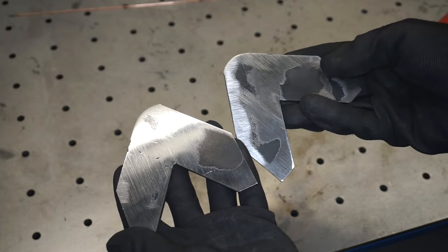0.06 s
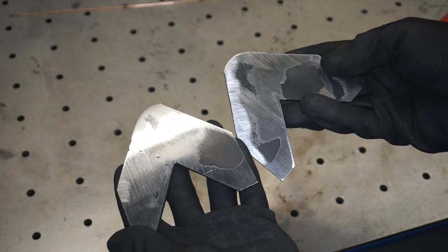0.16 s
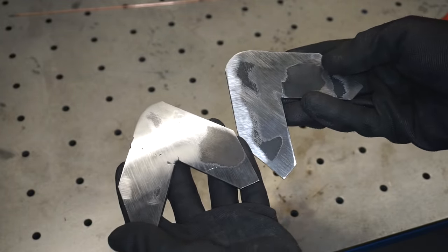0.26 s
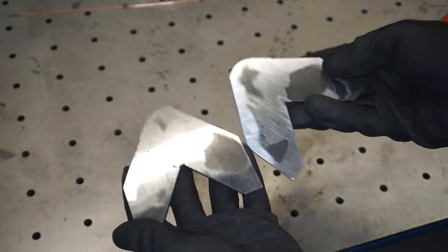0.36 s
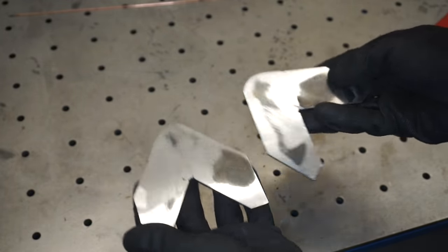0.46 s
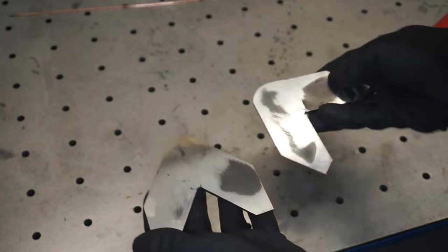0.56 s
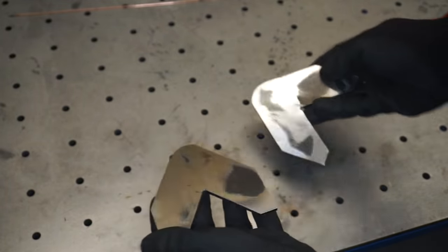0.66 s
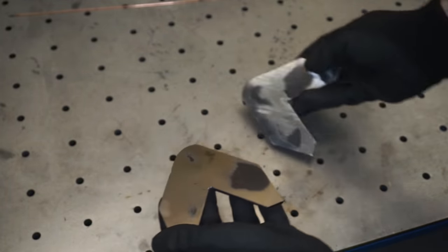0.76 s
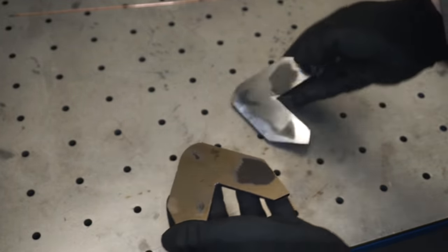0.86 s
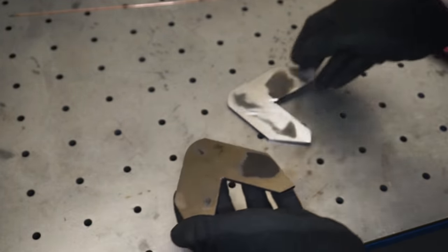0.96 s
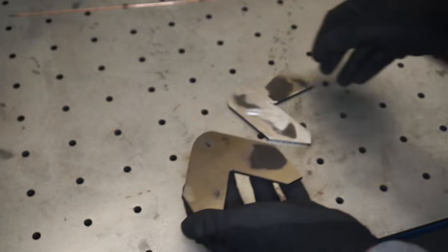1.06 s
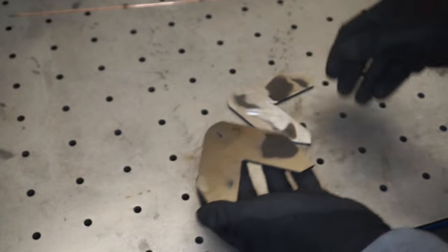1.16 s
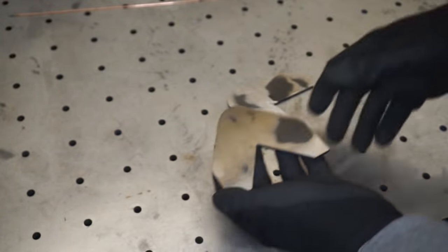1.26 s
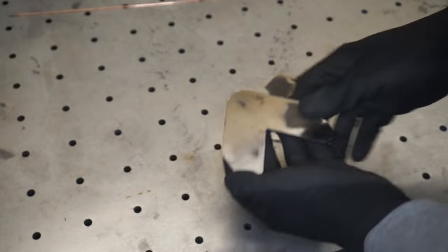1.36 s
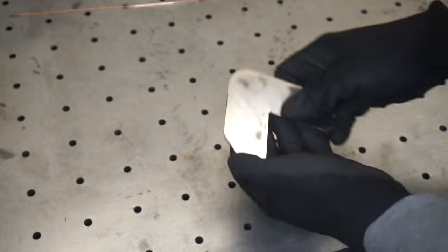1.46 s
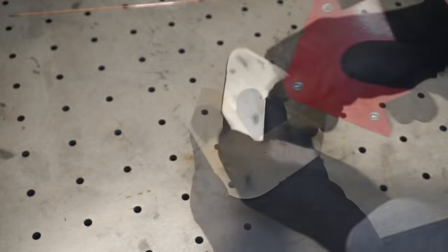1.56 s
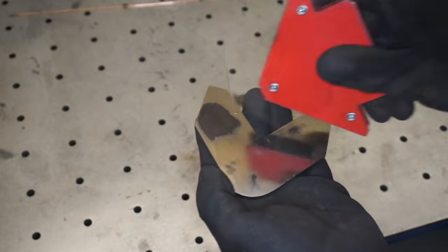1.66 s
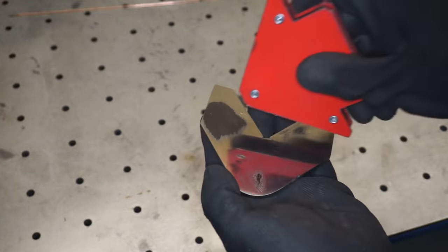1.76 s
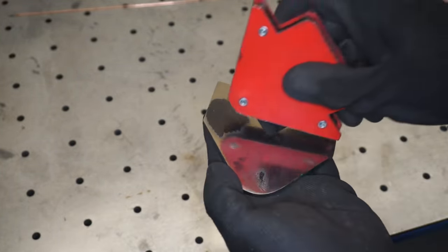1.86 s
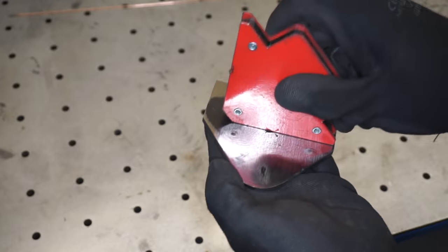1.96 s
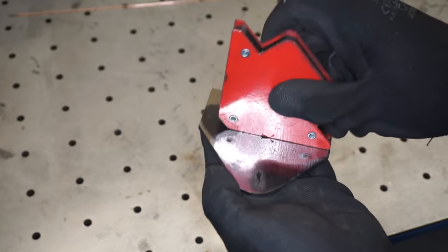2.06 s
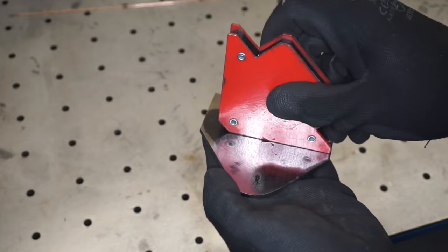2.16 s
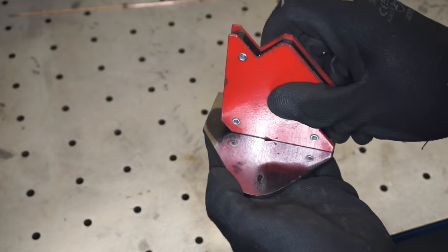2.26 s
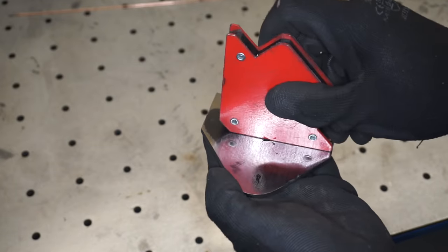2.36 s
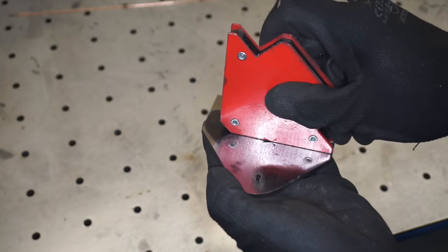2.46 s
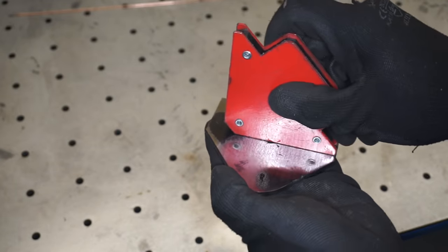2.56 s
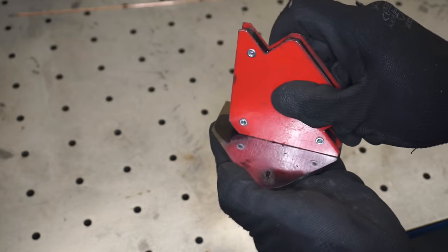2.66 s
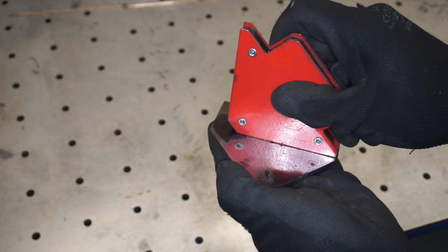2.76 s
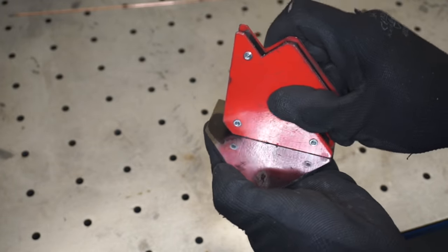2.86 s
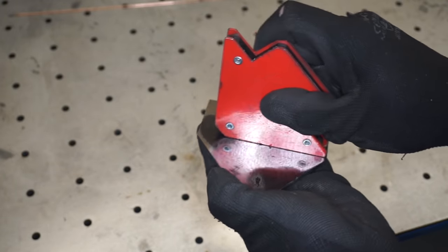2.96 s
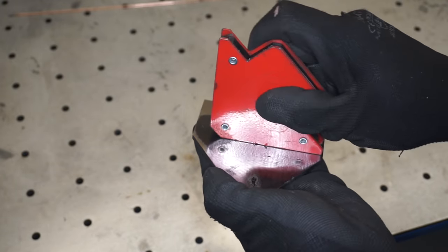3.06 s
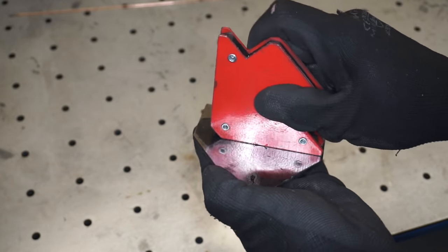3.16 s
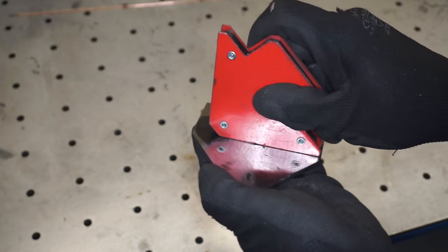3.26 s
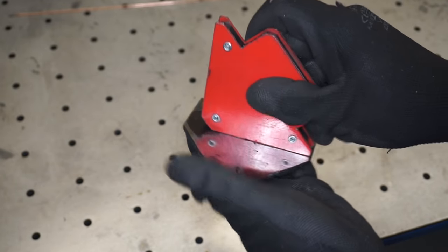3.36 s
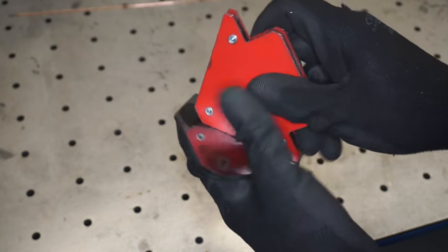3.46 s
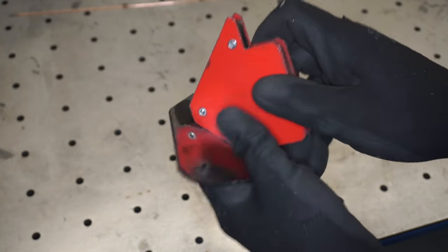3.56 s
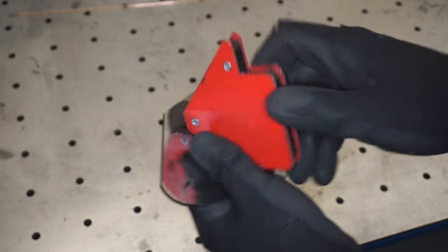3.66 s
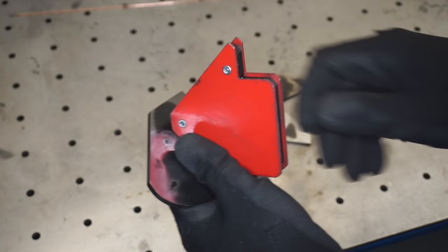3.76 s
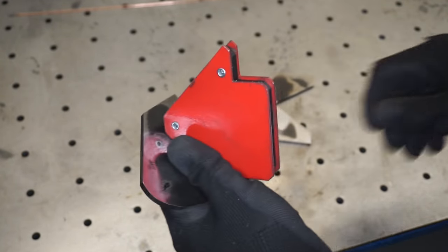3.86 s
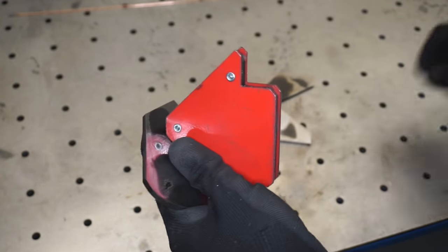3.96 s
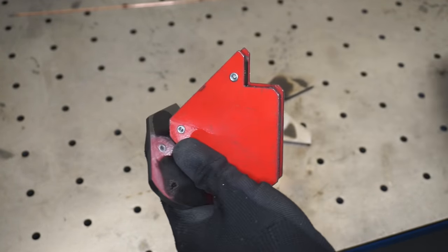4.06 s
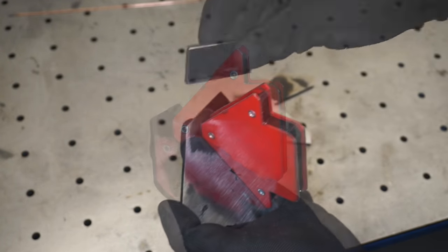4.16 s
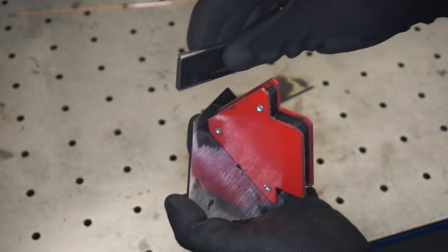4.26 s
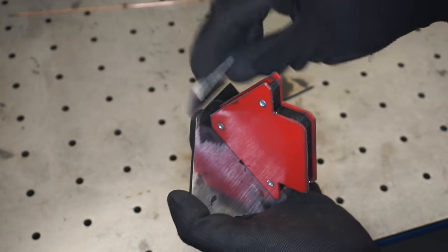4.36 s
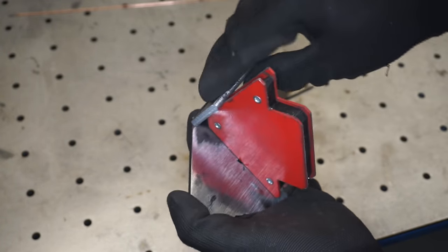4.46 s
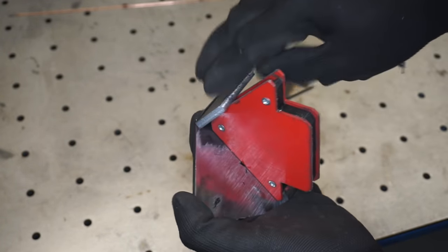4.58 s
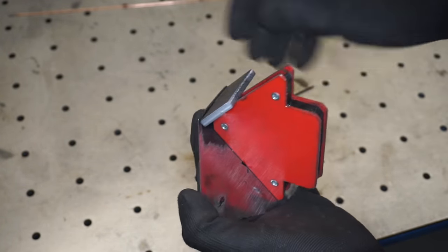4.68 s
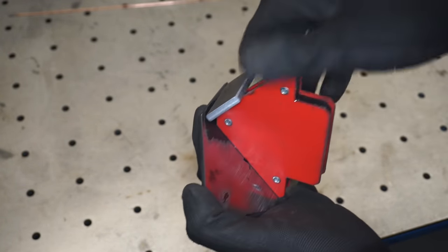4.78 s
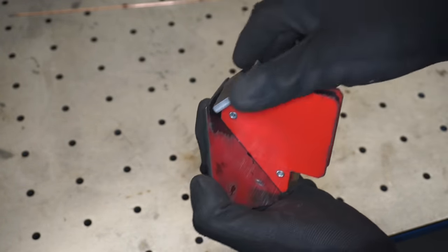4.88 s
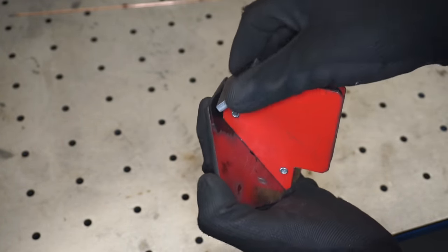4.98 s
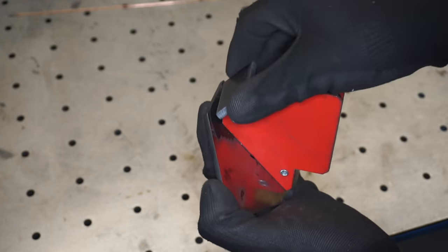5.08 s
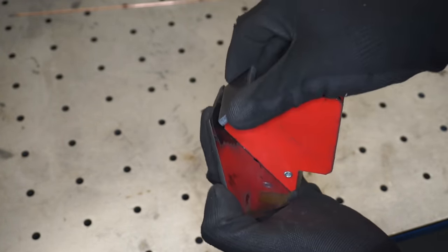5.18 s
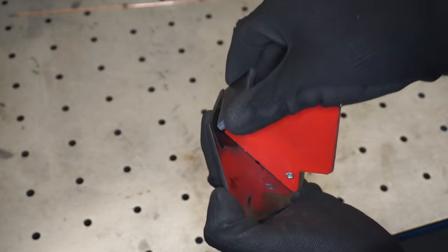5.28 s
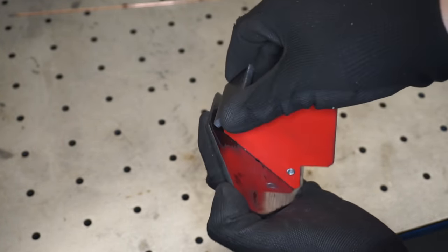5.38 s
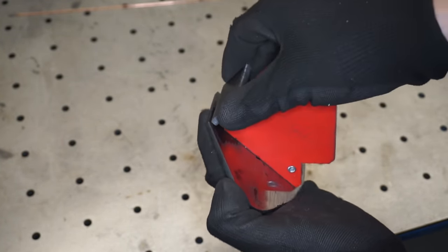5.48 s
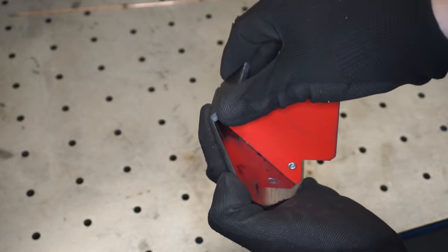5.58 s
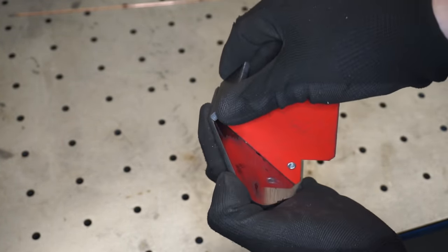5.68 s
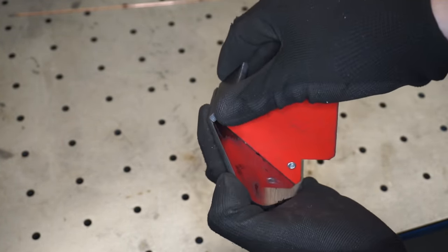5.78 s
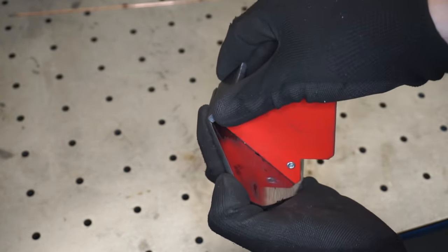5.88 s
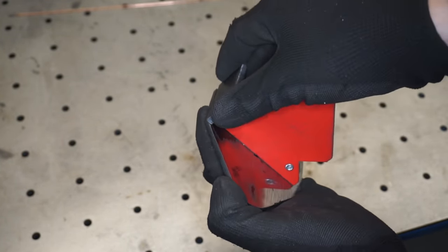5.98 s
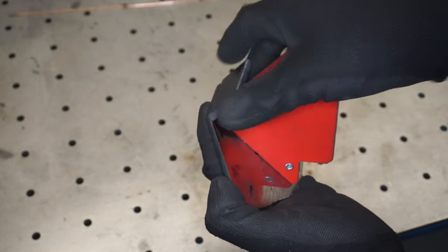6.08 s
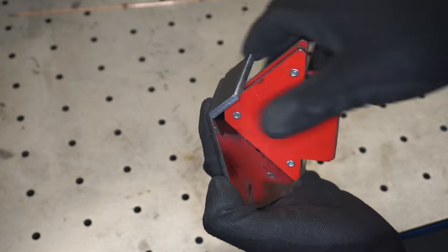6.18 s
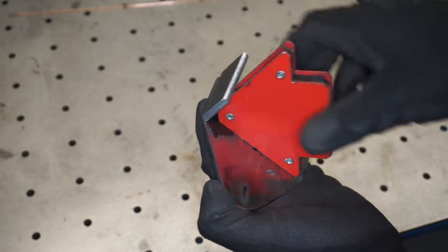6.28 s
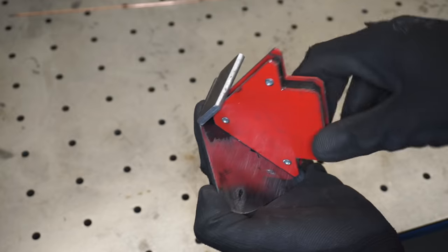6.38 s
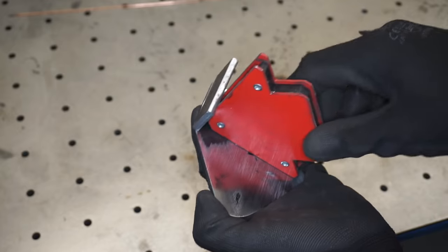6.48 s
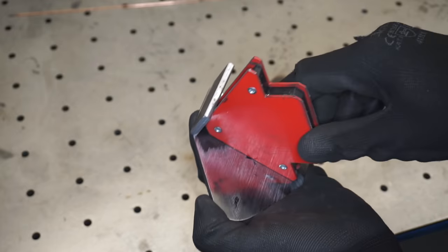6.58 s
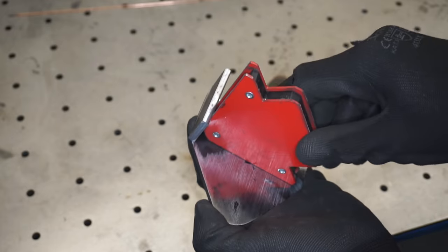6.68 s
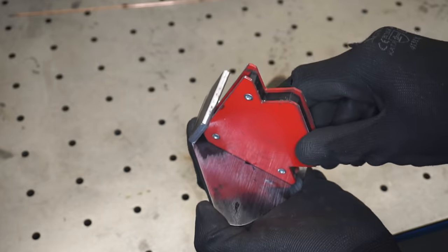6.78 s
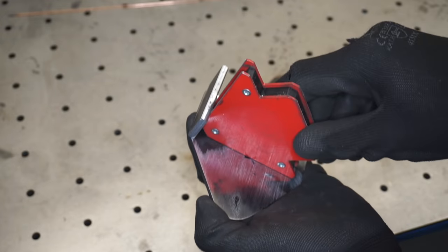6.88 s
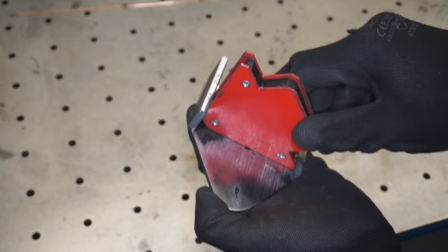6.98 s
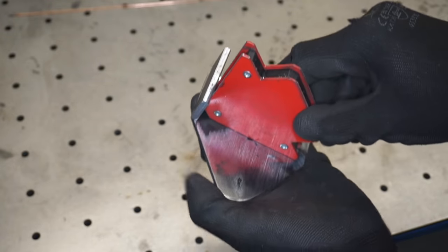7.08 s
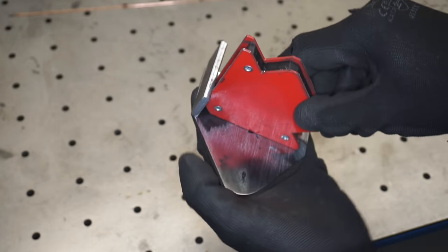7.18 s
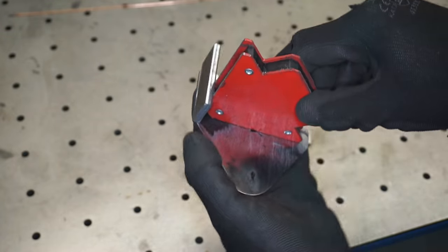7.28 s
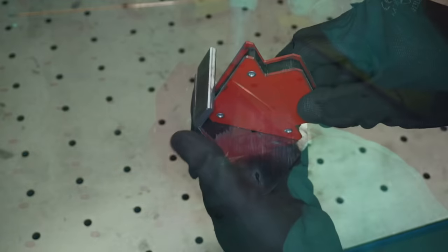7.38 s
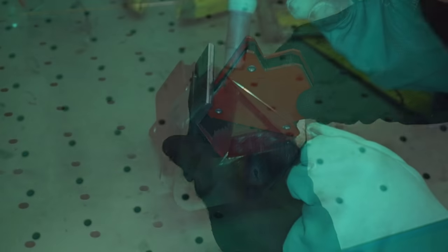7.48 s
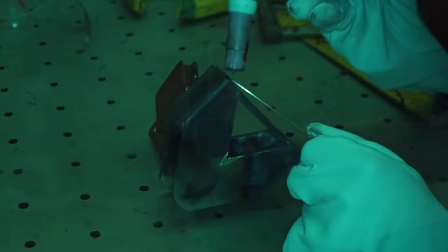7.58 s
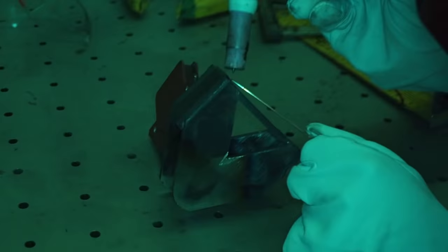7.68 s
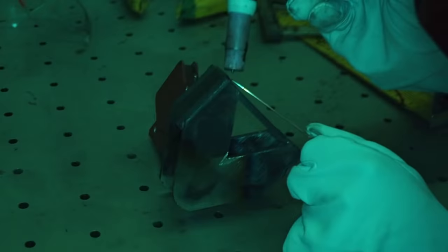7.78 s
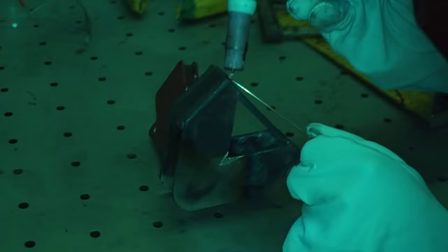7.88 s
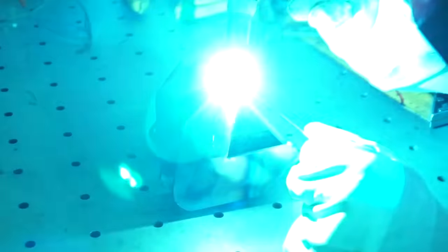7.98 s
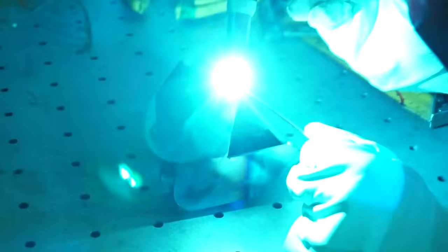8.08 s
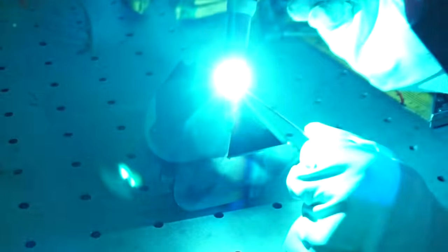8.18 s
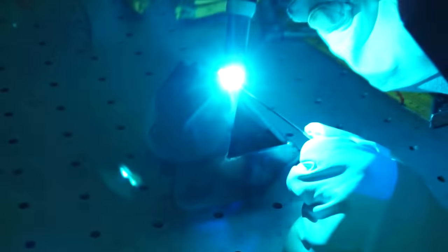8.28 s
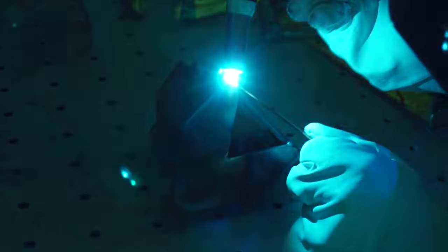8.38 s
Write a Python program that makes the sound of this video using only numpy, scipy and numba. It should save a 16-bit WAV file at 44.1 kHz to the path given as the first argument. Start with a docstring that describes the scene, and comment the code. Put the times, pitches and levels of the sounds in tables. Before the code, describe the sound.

Gloved hands handle small steel parts, heard close with short bright room reflections. A bracket clatters down in quick uneven knocks, a magnet clacks on loudly, and a plate snaps flat and is pushed home. Quiet rustles fill the gaps over faint room tone. Then hollow gas flow starts, two crackling sparks light a welding arc, and its fine hiss continues.

```python
"""A small hard workshop: flat steel brackets clatter onto a steel table, a magnet square snaps onto one, a plate clicks.
Each blow excites decaying modes and a decaying wash of dense overtones; gloves and sliding steel are shaped noise.
Then gas rushes from a TIG torch (resonant noise), the starter sparks twice and the arc hisses on with a thin whine.
Diffuse reflections follow the blows, rubs and arc; a limiter ducks under strong peaks and a low-pass cuts the top."""
import sys
import numpy as np
from scipy import signal
from scipy.fft import rfft, irfft
from scipy.io import wavfile
from scipy.ndimage import uniform_filter1d, minimum_filter1d
from numba import njit

SR = 44100
rng = np.random.default_rng(int(sys.argv[2]) if len(sys.argv) > 2 else 0)


def dump(signal):
    """Clip the signal to [-1, 1] and save it as 16-bit WAV at the path in sys.argv[1]."""
    limited = np.clip(np.atleast_2d(signal).T, -1, 1)
    pcm = np.round(limited * 32767).astype(np.int16)
    wavfile.write(sys.argv[1], SR, pcm)


N = 371763
TIME = np.arange(N) / SR

# Likeness of left and right in sound from all around. Each row: frequency in Hz, correlation.
DIFFUSE_LIKENESS = [(100, .97), (330, .96), (450, .92), (620, .76), (1200, .42), (3500, .05), (10000, -.1)]
# Likeness of left and right in sound straight from a source. Each row: frequency in Hz, correlation.
DIRECT_LIKENESS = [(400, .95), (1500, .75), (4000, .42), (10000, .25)]
# Dense overtones of small steel contacts. Each row: frequency in Hz, relative level in dB per Hz.
SMALL_CONTACT_BODY = [(100, -37.5), (500, -23.5), (1000, -18.5), (1400, -3.5), (2800, 1.5), (4100, 5),
                      (5300, -5.5), (7000, -2), (8500, -11), (11500, -8), (16000, -23.5)]
# Broad resonances of the plate against the magnet. Each row: frequency in Hz, width in Hz, full lift in dB.
PLATE_RESONANCES = [(1560, 540, 5), (1856, 740, 9), (4150, 530, 2.5)]


def amp(db):
    """Level to amplitude: 20 dB is a factor of ten."""
    return 10 ** (np.asarray(db) / 20)


def unit(x):
    """Normalization: equal mean power gives every sound rms 1."""
    return x / np.sqrt(np.mean(x ** 2))


def at_hz(table, hz):
    """Logarithmic pitch: (Hz, value) points are joined by straight lines over log frequency."""
    f, value = np.transpose(table)
    return np.interp(np.log(hz + 1), np.log(f), value)


def fade(t60, size):
    """Viscous damping: a free vibration decays exponentially, by 60 dB in t60 seconds."""
    return np.exp(-np.log(1000) * TIME[:size] / t60)


def envelope(start_s, length_s, rise_s, fall_s):
    """Attack, hold and release: a gain eases in from the start and dies away after the length."""
    age = np.maximum(TIME - start_s, 0)
    attack = 1 - np.exp(-(age / rise_s) ** 2)
    release = np.exp(-np.maximum(age - length_s, 0) / fall_s)
    return attack * release


def flicker(rate, depth_db):
    """Random modulation: a gain wanders between random levels drawn rate times a second."""
    knots = rng.standard_normal(N)
    level_db = depth_db * np.interp(TIME * rate, np.arange(N), knots)
    return unit(amp(level_db))


def noise(colour, likeness, size=N, tilt_db=0, peaks=()):
    """Spectral shaping: white noise is weighted by a colour, a tilt in dB per octave and resonances, to rms 1."""
    hz = np.arange(size // 2 + 1) * SR / size
    db = at_hz(colour, hz) + tilt_db * np.log2(hz / 4000 + .1)
    db = db + sum(lift / (1 + (2 * (hz - f) / width) ** 2) for f, width, lift in peaks)
    # the balance of mid and side sets the correlation of left and right
    alike = np.clip(at_hz(likeness, hz), -1, 1)
    white = rfft(rng.standard_normal((2, size)))
    mid, side = white * amp(db) * np.sqrt([1 + alike, 1 - alike])
    return unit(irfft([mid + side, mid - side], size))


def add(out, s, sound):
    """Superposition: sound pressures sum, here from time s on."""
    i = int(s * SR)
    out[:, i:i + sound.shape[1]] += sound[:, :N - i]


def pan(x, left_db):
    """Level-difference stereo: left_db is the left level minus the right."""
    return x * amp(np.array([[left_db], [-left_db]]) / 2)


def strike(blows, modes, body, body_t60, peaks=(), scatter_db=2):
    """Modal excitation: each blow starts a decaying wash of dense overtones and the piece's clear modes."""
    out = np.zeros((2, N))
    hz, mode_db, t60 = np.transpose(modes)[:, :, None]
    contact = 1 - np.exp(-(TIME[:SR] / 0.0012) ** 2)  # the push builds up in about a millisecond
    for s, db, tilt_db, ring_db in blows:
        # the point of contact weights the modes
        scatter = scatter_db * rng.standard_normal(hz.shape)
        weight = amp(mode_db + tilt_db * np.log2(hz) + scatter)
        # each mode has its own phase difference between the channels, smaller below 4 kHz
        lag = rng.uniform(-0.69, 1, hz.shape) * np.minimum(hz / 4000, 1)
        phase = 2 * np.pi * (hz * TIME[:SR] + rng.random(hz.shape)) + np.array([lag, -lag])
        ring = (weight * fade(t60, SR) * np.sin(phase)).sum(axis=1)
        ring = ring / np.sqrt(np.sum(weight ** 2) / 2)
        wash = noise(body, DIRECT_LIKENESS, size=SR, tilt_db=tilt_db, peaks=peaks) * fade(body_t60, SR)
        add(out, s, amp(db) * contact * (wash + amp(ring_db) * ring))
    return out


def room_tone():
    """Stationary noise: a quiet, steady background of fixed spectrum."""
    # Each row: frequency in Hz, relative level in dB per Hz.
    floor_colour = [(25, -27.5), (60, -18), (107, -18), (168, -16.5), (240, -17.5), (330, -14.5),
                    (450, -21), (900, -26), (1760, -25), (4810, -31.5), (13200, -31), (16000, -39.5)]
    return amp(-60) * noise(floor_colour, DIFFUSE_LIKENESS)


def rumble():
    """Amplitude modulation: faint, deep noise swells now and then above its resting level."""
    # Each row: frequency in Hz, relative level in dB per Hz.
    rumble_colour = [(15, -34), (25, -16), (32, -5.5), (41, -1.5), (55, -15), (90, -33.5), (300, -69.5)]
    # Bouts of rumble. Each row: start in seconds, length in seconds, level in dB.
    bouts = [(0, 0.075, -55), (.62, .25, -77), (1.686, 0.37, -58), (2.57, 0.57, -59.5),
             (3.447, 0.35, -57.5), (5.52, 1.02, -74), (7.48, .25, -74)]
    rest_db, rise_s, fall_s = -71, 0.039, 0.075
    swell = sum(amp(db) * envelope(s, length_s, rise_s, fall_s) for s, length_s, db in bouts)
    return (amp(rest_db) + swell) * noise(rumble_colour, DIFFUSE_LIKENESS)


def gas():
    """Turbulence: shielding gas rushes from the torch cup over the steel, with a few hollow resonances."""
    # Each row: frequency in Hz, relative level in dB per Hz.
    gas_colour = [(40, -29), (110, -22.5), (165, -9.5), (250, -7.5), (330, -3.5), (390, -9.5), (480, -4),
                  (560, -8), (1550, -9), (1950, -11.5), (4030, -16), (6650, -28.5), (10700, -28),
                  (16000, -35)]
    # Resonances in the rush. Each row: frequency in Hz, width in Hz, lift in dB.
    hollows = [(322, 14, 9), (514, 16, 16), (618, 20, 5), (890, 20, 6), (1029, 25, 4), (1419, 14, 6),
               (1534, 24, 8)]
    start_s, rise_s, level_db = 7.32, 0.15, -20.5
    # the valve opens and the flow builds up
    flow = 1 - np.exp(-np.maximum(TIME - start_s, 0) / rise_s)
    rush = noise(gas_colour, DIFFUSE_LIKENESS, peaks=hollows)
    return amp(level_db) * flow * flicker(rate=34, depth_db=0.7) * rush


def arc():
    """Electrical discharge: two spark bursts light the arc, which settles to a fine hiss and a thin whine."""
    # Starter sparks. Each row: start in seconds, level in dB, t60 in seconds, rise in seconds.
    sparks = [(7.799, -3.5, 0.27, 0.0015), (7.976, 11, 0.13, 0.011)]
    # Spectrum of the sparks, strongest at the very top. Each row: frequency in Hz, relative level in dB per Hz.
    spark_colour = [(500, -44), (6000, -29.5), (9500, -20), (15500, -20), (17500, -0.5), (20000, -6)]
    # Spectrum of the hiss. Each row: frequency in Hz, relative level in dB per Hz.
    arc_colour = [(1000, -3), (5000, 3.5), (7500, -4.5), (9500, 3), (11200, -1), (12200, 10.5), (13200, 0),
                  (15000, 2), (16000, 7)]
    strike_db, steady_db = -25, -36
    strike_s, rise_s, settle_s = 0.24, .012, 0.014
    whine_hz, whine_db, whine_start_s = 10602, -44, 8.08
    # loud from the first spark until the arc takes hold, then steady
    lit_s = sparks[0][0]
    striking = amp(strike_db) * envelope(lit_s, strike_s, rise_s, settle_s)
    steady = amp(steady_db) * (TIME > lit_s)
    out = (striking + steady) * noise(arc_colour, DIRECT_LIKENESS)
    for s, db, t60, spark_rise_s in sparks:
        burst = fade(t60, SR) * (1 - np.exp(-TIME[:SR] / spark_rise_s))
        add(out, s, amp(db) * burst * noise(spark_colour, DIRECT_LIKENESS, size=SR))
    whine = amp(whine_db) * (TIME > whine_start_s) * np.sin(2 * np.pi * whine_hz * TIME)
    return out * flicker(rate=390, depth_db=1.5) + whine * flicker(rate=110, depth_db=1)


def stroke(length_s):
    """Speed-dependent friction: a rub gathers speed over a share of its length, then lets go."""
    return envelope(0, length_s, rise_s=0.32 * length_s, fall_s=.035)[:SR]


def handling():
    """Stick-slip friction: gloves and steel rub in fine, uneven grains; a sliding plate sounds its resonances."""
    # Gloves over steel. Each row: start in seconds, length in seconds, level in dB, brightness in dB per octave.
    rubs = [(0.329, .53, -54, -1.5), (1.664, .3, -63.5, 0), (2.642, 0.07, -59, 0.5),
            (3.055, 0.029, -51, 6.5), (3.393, .055, -54, 1), (3.432, 0.36, -52, 1), (3.781, 0.34, -55, -1),
            (4.295, 0.37, -61, 0), (6.148, 0.072, -52.5, -1.5), (6.199, 0.29, -63, 0.5),
            (6.574, .04, -51, .5), (7.089, 0.22, -49, 0.5)]
    # Spectrum of the gloves. Each row: frequency in Hz, relative level in dB per Hz.
    rub_colour = [(200, 0.5), (900, -9), (1800, -1.5), (4000, 0), (6500, -7), (11000, -2), (16000, -6)]
    # Resonances of rubbed steel. Each row: frequency in Hz, width in Hz, lift in dB.
    rub_resonances = [(1800, 580, 4.5), (3770, 830, 4.5)]
    # Steel on steel. Each row: start in seconds, length in seconds, level in dB, brightness in dB per octave,
    # share of the plate's resonances from 0 to 1.
    slides = [(3.934, 0.081, -42.5, 5, 0), (4.798, 0.45, -56.5, -1.5, 0.5), (5.328, 0.13, -49.5, 0, 0.47),
              (5.53, 0.091, -38.5, 1, 0.94)]
    # Spectrum of sliding steel. Each row: frequency in Hz, relative level in dB per Hz.
    slide_colour = [(200, -22), (600, -15.5), (1050, -15.5), (1600, -4.5), (2300, -1), (2900, -3.5),
                    (4200, -3), (7000, -8.5), (11500, -2.5), (16000, -16.5)]
    out = np.zeros((2, N))
    for s, length_s, db, tilt_db in rubs:
        rub = noise(rub_colour, DIFFUSE_LIKENESS, size=SR, tilt_db=tilt_db, peaks=rub_resonances)
        add(out, s, amp(db) * stroke(length_s) * rub)
    for s, length_s, db, tilt_db, share in slides:
        peaks = [(hz, width, share * lift) for hz, width, lift in PLATE_RESONANCES]
        slide = noise(slide_colour, DIFFUSE_LIKENESS, size=SR, tilt_db=tilt_db, peaks=peaks)
        add(out, s, amp(db) * stroke(length_s) * slide)
    grain = flicker(rate=350, depth_db=1.5)
    return grain * out


def singing():
    """Beating: two close modes of a bracket sing faintly as it is picked up, until the glove damps them."""
    start_s, length_s, level_db = 1.205, 0.52, -47
    centre_hz, beat_hz, t60_s = 6901, 3.76, 3
    # the product of these sines is a pair of tones beat_hz apart
    pair = np.sin(np.pi * beat_hz * TIME) * np.sin(2 * np.pi * centre_hz * TIME)
    held = envelope(0, length_s, rise_s=.03, fall_s=.03)
    ring = amp(level_db) * pair * fade(t60_s, N) * held
    out = np.zeros((2, N))
    add(out, start_s, pan(ring, left_db=-14.0))
    return out


def magnet():
    """Magnetic attraction and impact: a bracket snaps on; a plate meets edge first, then flat, and is pushed home."""
    # Magnet snapping on. Each row: start in seconds, level in dB, brightness in dB per octave, ring in dB.
    snap_blows = [(1.992, 12, 6.5, -15), (2.001, -8, -10.5, -3.5)]
    # Modes of the magnet. Each row: frequency in Hz, relative level in dB, t60 in seconds.
    magnet_modes = [(2449, -6, .3), (2584, -2, .4), (2625, -5, .45), (2842, 1, .3), (5103, -6, .2),
                    (5133, -10, .2), (6519, -10, .2), (10030, -4, .15)]
    # Dense overtones of the magnet. Each row: frequency in Hz, relative level in dB per Hz.
    magnet_body = [(100, -55), (330, -21), (900, -15), (1500, 1.5), (2700, 7.5), (4000, 1.5), (6500, -3.5),
                   (9000, -7), (11000, -11), (13000, -20.5), (15500, -30), (17500, -5)]
    # Broad resonances of its riveted stack. Each row: frequency in Hz, width in Hz, lift in dB.
    stack_resonances = [(680, 200, 9), (1450, 250, 6), (2560, 260, 12), (2842, 90, 10), (5110, 150, 8),
                        (5523, 120, 5), (6470, 280, 8), (8640, 220, 9), (10040, 130, 17), (11655, 170, 13),
                        (12200, 150, 8), (14250, 350, 7)]
    # Plate's edge touching. Each row: start in seconds, level in dB, brightness in dB per octave, ring in dB.
    touch_blows = [(4.4715, -21, 4, 6)]
    # Modes of the plate's edge. Each row: frequency in Hz, relative level in dB, t60 in seconds.
    edge_modes = [(1770, 3, .04), (9420, -4, .05), (10400, -6, .04)]
    # Plate clicking flat. Each row: start in seconds, level in dB, brightness in dB per octave, ring in dB.
    click_blows = [(4.4972, 7.5, 6.5, -14), (4.506, -5.5, 2.5, -4)]
    # Modes of the plate. Each row: frequency in Hz, relative level in dB, t60 in seconds.
    plate_modes = [(3580, 2.5, 0.042), (4980, -5, 0.056), (9420, 2, 0.036), (10300, -1, .05),
                   (10750, 4, 0.045), (10700, -8, .04)]
    # Dense overtones of the plate. Each row: frequency in Hz, relative level in dB per Hz.
    plate_body = [(100, -42), (500, -24), (1100, -16), (1650, -7), (3000, 0), (5000, -1.5), (6500, -9),
                  (8500, -8), (10800, -2), (12000, -11), (16000, -24)]
    # Steel shifting and seating in the hand. Each row: start in seconds, level in dB,
    # brightness in dB per octave, ring in dB.
    tick_blows = [(2.834, -46, 1.5, -21.5), (3.043, -37.5, 3.5, -23), (4.877, -35, 5, -23),
                  (5.602, -9.5, 6.5, -17.5), (6.277, -41, -1, -14), (7.167, -50, 5, -11)]
    # Modes of the plate seated on the magnet. Each row: frequency in Hz, relative level in dB, t60 in seconds.
    seated_modes = [(1900, -3, .08), (4054, -3, .09), (4237, 0, .1), (6309, -12, .08), (6697, -12, .08)]
    snap = strike(snap_blows, magnet_modes, magnet_body, body_t60=0.11, peaks=stack_resonances)
    touch = strike(touch_blows, edge_modes, plate_body, body_t60=0.06, peaks=PLATE_RESONANCES)
    clicks = strike(click_blows, plate_modes, plate_body, body_t60=0.017, peaks=PLATE_RESONANCES)
    ticks = strike(tick_blows, seated_modes, SMALL_CONTACT_BODY, body_t60=0.024, peaks=PLATE_RESONANCES)
    return snap + touch + clicks + ticks


def bracket():
    """Contact damping: a bracket rings while it rocks; landing flat stops it and leaves the table ringing."""
    # Corners grazing in the hands. Each row: start in seconds, level in dB, brightness in dB per octave, ring in dB.
    graze_blows = [(.5828, -40, 1.5, 18)]
    # Modes of a grazed corner. Each row: frequency in Hz, relative level in dB, t60 in seconds.
    corner_modes = [(1826, -20.5, 0.024), (12500, -0.5, .008), (13200, -6.5, 0.011)]
    # Rocking on the table. Each row: start in seconds, level in dB, brightness in dB per octave, ring in dB.
    rocking_blows = [(.8705, -20, -5, -8.5), (.903, -13.5, -2, -6.5), (.939, -18.5, 7, 4),
                     (.966, -18.5, 2, 6), (1.012, -20, 2, 7.5), (1.036, -19.5, 0, 10)]
    # Modes of the loose bracket. Each row: frequency in Hz, relative level in dB, t60 in seconds.
    bracket_modes = [(1712, -5, .3), (2514, -3, .4), (2850, -1, .3), (3746, 5, .4), (4642, -7, .4),
                     (4871, -5, .25), (4915, -10, .25), (5423, -2, .4), (6597, 7, .45), (7984, -8, .4),
                     (8550, 0, .45), (10018, -7, .2), (11722, 2, .3), (12232, 3, .25), (14200, -1, .2)]
    # Dense overtones of the rocking bracket. Each row: frequency in Hz, relative level in dB per Hz.
    rocking_body = [(50, -36.5), (150, -21), (330, -11.5), (900, -6.5), (1400, -1.5), (3000, 3),
                    (5000, -7.5), (8000, -8.5), (12000, -17), (15500, -25)]
    # Landing flat. Each row: start in seconds, level in dB, brightness in dB per octave, ring in dB.
    landing_blows = [(1.074, -3, 3, -15), (1.09, -7, 15.5, -10), (1.14, -18.5, -6, -16)]
    # Modes of the table. Each row: frequency in Hz, relative level in dB, t60 in seconds.
    table_modes = [(1610, 0, .6), (2482, -7, .4), (2745, -7, .4), (3343, -7, .4), (6100, -10, .3),
                   (7768, -13, .3), (9760, -12, .2), (10602, -5, .35), (13318, -15, .2), (13588, -11, .25)]
    # Dense overtones of the table. Each row: frequency in Hz, relative level in dB per Hz.
    table_body = [(50, -25), (150, -13.5), (330, -6.5), (900, -6.5), (1600, 6), (3000, 5), (5000, -5),
                  (8000, -11), (12000, -11), (15500, -29)]
    graze = strike(graze_blows, corner_modes, SMALL_CONTACT_BODY, body_t60=0.025)
    # chatter against the table smears each mode into a narrow band
    buzz_width_hz, buzz_lift_db = 110, 13
    buzz = [(hz, buzz_width_hz, buzz_lift_db) for hz, _, _ in bracket_modes]
    rocking = strike(rocking_blows, bracket_modes, rocking_body, body_t60=0.77, peaks=buzz, scatter_db=3.0)
    landing_s = landing_blows[0][0]
    free = np.exp(-np.maximum(TIME - landing_s, 0) / 0.018)
    landing = strike(landing_blows, table_modes, table_body, body_t60=0.22)
    return graze + free * rocking + landing


def workshop(x, wet_db, build_s):
    """Reverberation: diffuse reflections build up quickly and decay at a rate that depends on frequency."""
    # Each row: frequency in Hz, t60 in seconds.
    room_t60 = [(100, 0.85), (400, 0.49), (2000, 0.7317), (5000, 0.6048), (8000, 0.48), (14000, 0.3)]
    # Each row: frequency in Hz, relative level in dB.
    room_colour = [(100, -1), (500, 9.5), (2000, 1), (6000, 4.5), (15000, 2)]
    wash = rfft(noise(room_colour, DIFFUSE_LIKENESS, size=SR))
    hz = np.arange(wash.shape[1])  # one second of noise has bins 1 Hz apart
    band_hz = np.array(room_t60)[:, 0]
    tail = 0
    # overlapping bands, each with its own decay
    for own, (_, t60) in zip(np.eye(len(room_t60)), room_t60):
        share = at_hz(np.column_stack([band_hz, own]), hz)
        tail = tail + irfft(wash * share, SR) * fade(t60, SR)
    build = 1 - np.exp(-(TIME[:SR] / build_s) ** 2)
    tail = unit(tail * build) / np.sqrt(SR)
    mono = x.sum(axis=0, keepdims=True) / np.sqrt(2)
    return x + amp(wet_db) * signal.fftconvolve(mono, tail, axes=1)[:, :N]


def scene():
    """Superposition of steel, gloves and torch in the workshop, over a quiet room tone."""
    background = pan(room_tone() + rumble(), left_db=-4.0)
    rush = pan(gas(), left_db=0.85)
    work = workshop(arc() + handling() + magnet() + bracket(), wet_db=-7, build_s=0.018)
    return background + rush + singing() + work


@njit
def follow(size, attack, release):
    """Peak detection: a one-pole follower jumps up quickly and sinks slowly."""
    out, e = np.empty(len(size)), 0.
    for i in range(len(size)):
        e += (size[i] - e) * (attack if size[i] > e else release)
        out[i] = e
    return out


def limiter(x, ceiling_db, attack_s, release_s):
    """Gain reduction: one gain for both channels holds peaks down, so the room swells up behind strong blows."""
    linger_share, linger_s = 0.29, 0.56  # this share of the reduction in dB returns slowly
    ceiling = amp(ceiling_db)
    size = np.abs(x).max(axis=0)
    attack = 1 - np.exp(-1 / (attack_s * SR))
    fast_peak = follow(size, attack, 1 - np.exp(-1 / (release_s * SR)))
    slow_peak = follow(size, attack, 1 - np.exp(-1 / (linger_s * SR)))
    fast = ceiling / np.maximum(fast_peak, ceiling)
    slow = ceiling / np.maximum(slow_peak, ceiling)
    gain = np.minimum(fast, slow ** linger_share)
    # the gain falls just ahead of each peak and moves smoothly
    return x * uniform_filter1d(minimum_filter1d(gain, size=45), size=45)


def record(dry):
    """Limiting and band limitation: strong peaks are held down, then a steep low-pass cuts the top."""
    top_hz = 15900
    held = limiter(dry, ceiling_db=-9.0, attack_s=0.000067, release_s=0.031)
    low_pass = signal.ellip(12, .1, 90, top_hz, fs=SR, output="sos")
    return signal.sosfilt(low_pass, held)


dry = scene()
out = record(dry)
dump(out)
```